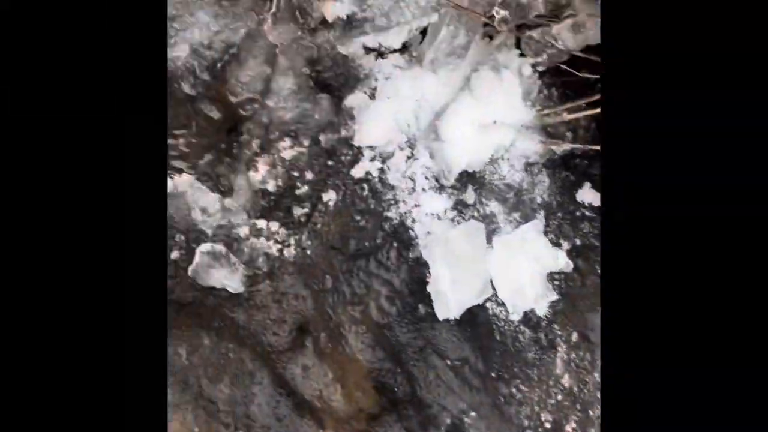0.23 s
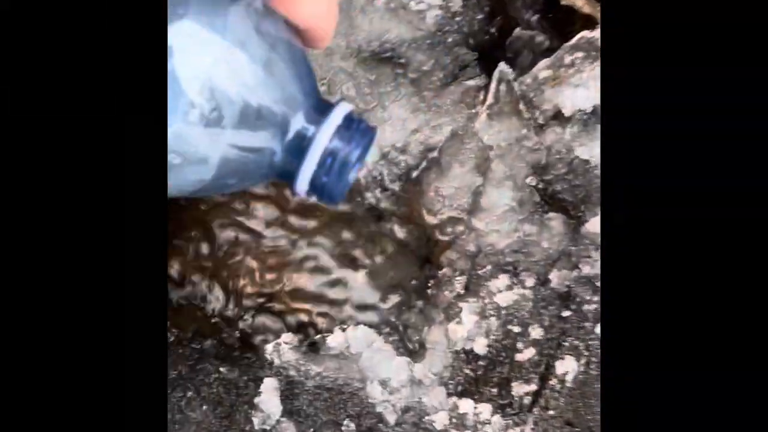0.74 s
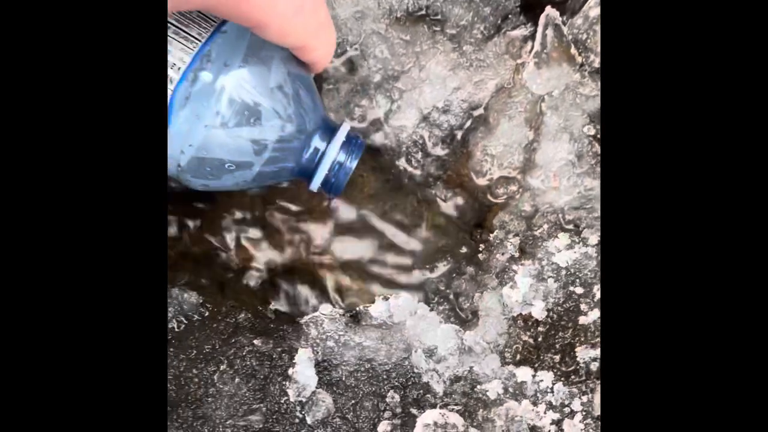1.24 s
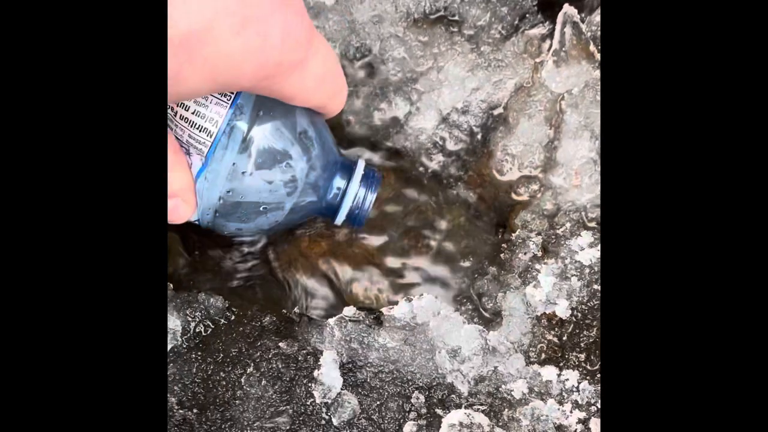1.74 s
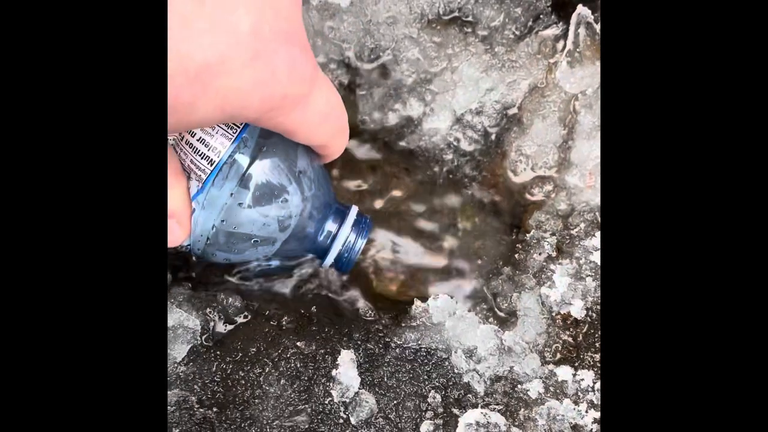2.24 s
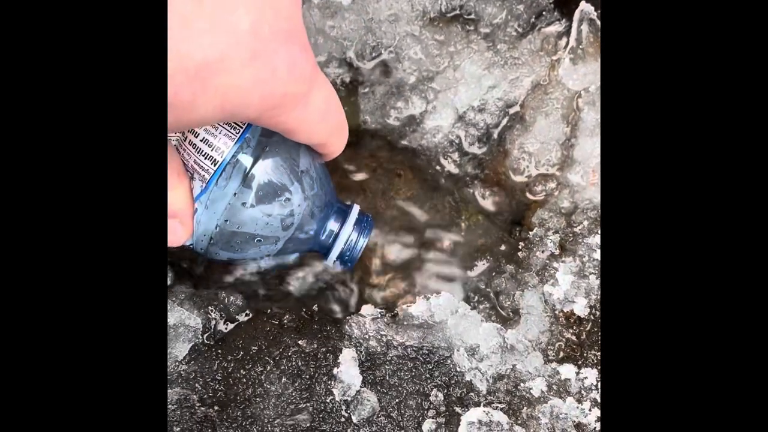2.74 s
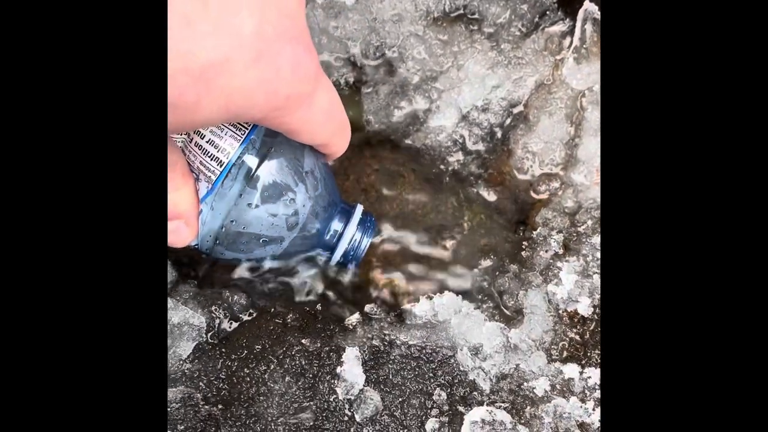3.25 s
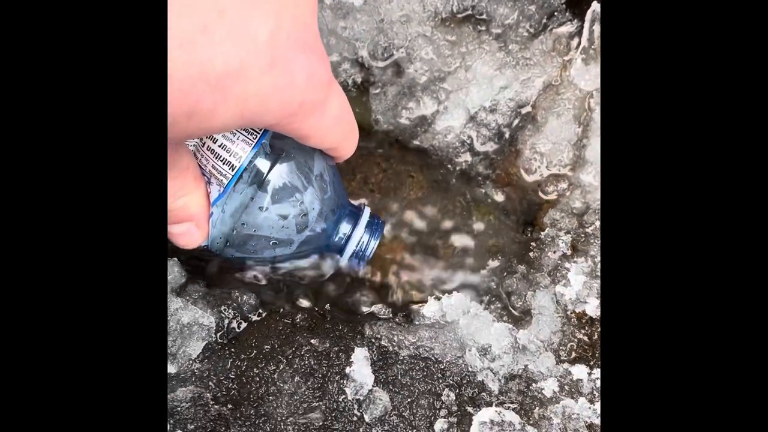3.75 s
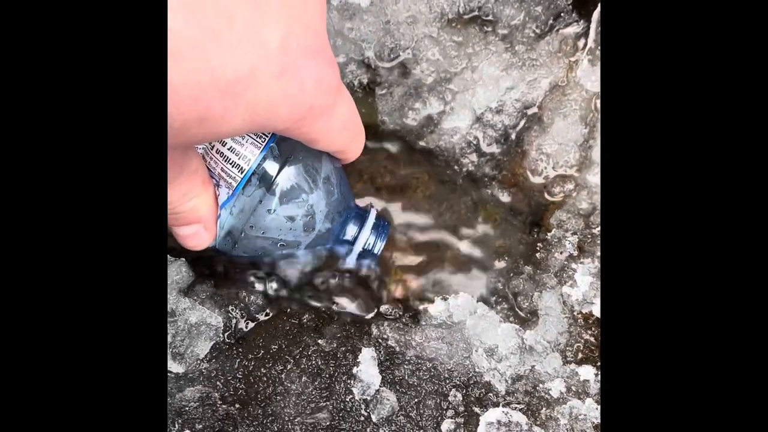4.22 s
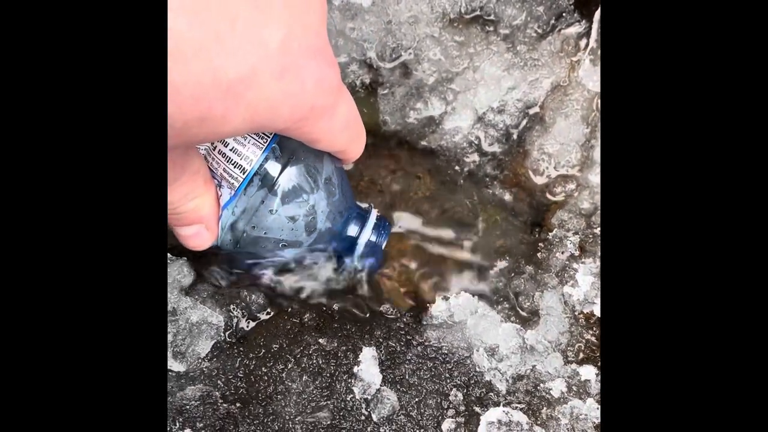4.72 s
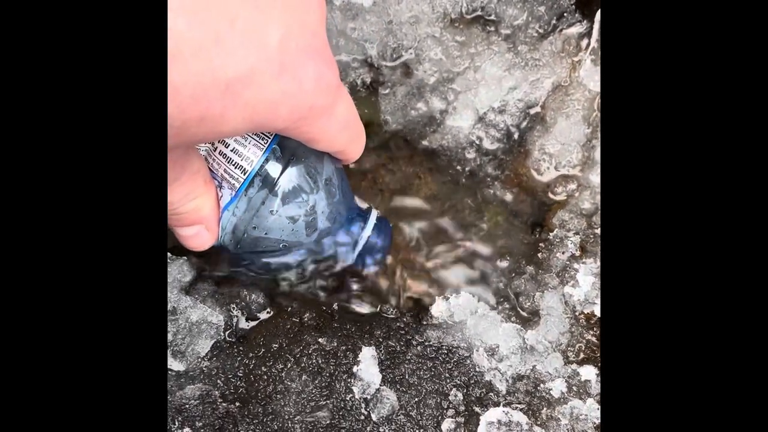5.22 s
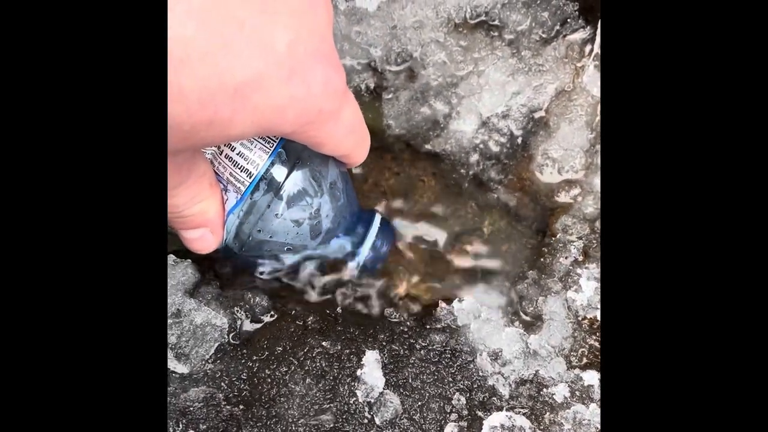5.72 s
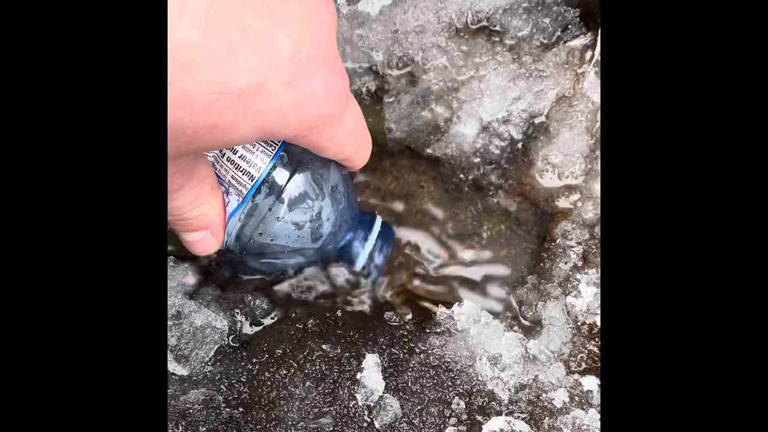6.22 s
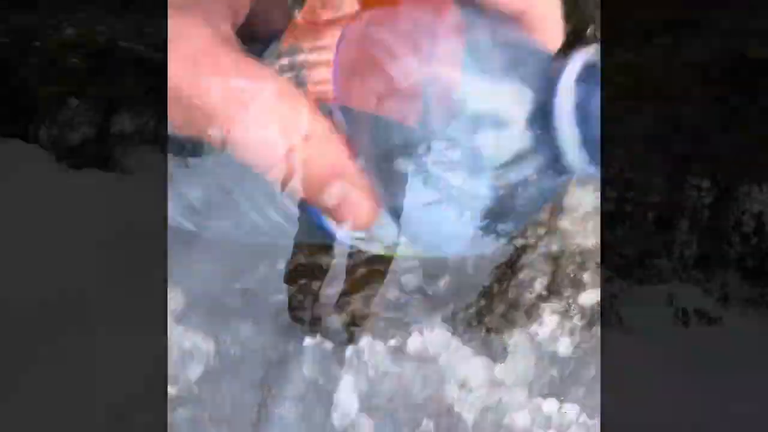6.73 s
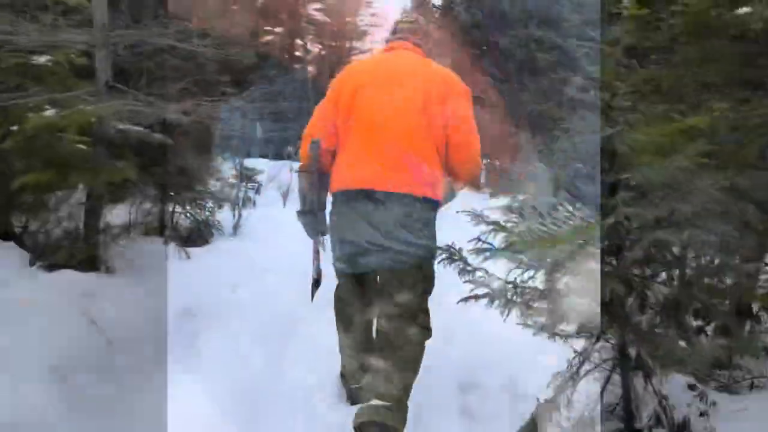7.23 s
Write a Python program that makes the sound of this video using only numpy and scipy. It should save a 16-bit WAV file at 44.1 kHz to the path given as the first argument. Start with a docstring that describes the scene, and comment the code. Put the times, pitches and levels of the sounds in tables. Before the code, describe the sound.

Close up outdoors, a shallow icy brook murmurs and hisses softly. A sleeve brushes, then a thin plastic bottle crackles with sharp, uneven snaps as it is pushed down, ending in two dull knocks on stone. Water then gurgles into the neck with irregular small glugs, plips and ticks. Lifting it brings another burst of loud plastic pops, and soft snow crunches under boots. A phone listens nearby in stereo.

```python
"""A thin plastic bottle crackles and knocks on stones as a hand pushes it into a shallow icy brook; air glugs
out of the neck while it fills, it crackles again when lifted, and boots crunch through snow at the end.
Snaps are noise bursts through ringing modes, knocks are decaying sines, bubbles are gliding sines and drops are
pitched puffs; friction, water, snow and rumble are filtered noise with moving levels. A phone with two microphone
ports listens from close by: below about 5 kHz near sounds are more alike in both than wide ones."""
import sys
import numpy as np
from scipy import signal
from scipy.fft import rfft, irfft, next_fast_len
from scipy.io import wavfile
from scipy.ndimage import uniform_filter1d

SR = 44100
rng = np.random.default_rng(int(sys.argv[2]) if len(sys.argv) > 2 else 0)


def dump_mix(stems):
    """Bounce the given channels to the path in sys.argv[1] as a 16-bit WAV at rate SR."""
    frames = np.atleast_2d(stems).T  # one column per channel
    limited = np.clip(frames, -1, 1)  # hard clip at full scale
    pcm = np.round(limited * 32767).astype(np.int16)
    wavfile.write(sys.argv[1], SR, pcm)


N = 329351

# ringing modes of the air and wall of the hollow bottle: f/Hz, relative level/dB, time to fall by 60 dB/s
HOLLOW_MODES = [(219.7, 3, 0.12), (265, -2, 0.059), (343, 6.5, 0.017), (376, -2.5, 0.032),
                (498.6, 5.5, 0.041), (720, -19.5, 0.016)]
# how lively the water trickles round the neck: t/s, level of the small bubbles/dB
TRICKLE_LEVEL = [(.3, -74), (1.8, -78), (2.15, -62.5), (3.2, -64.5), (4.4, -59), (5.4, -66), (6, -60.5),
                 (6.9, -55.5)]


def gain_of(db):
    """Decibels to amplitude."""
    return 10 ** (np.asarray(db) / 20)


def evened(x):
    """Scales to rms 1."""
    return x / np.sqrt(np.mean(x ** 2) + 1e-20)


def read(points, hz):
    """Reads a table over log frequency."""
    f, value = np.transpose(points)
    return np.interp(np.log(hz + 1), np.log(f + 1), value)


def add(mix, s, sound):
    """Mixes a sound in at s seconds."""
    part = mix[round(s * SR):][:len(sound)]
    part += sound[:len(part)]


def colour(x, points):
    """Causal minimum-phase filter with the given dB shape; white noise keeps its power."""
    shape_db = np.maximum(read(points, abs(np.fft.fftfreq(4096, 1 / SR))), -70)
    log_gain = np.log(gain_of(shape_db))
    taps = np.fft.ifft(np.exp(np.conj(signal.hilbert(log_gain)))).real[:2048]
    return signal.oaconvolve(x, taps / np.linalg.norm(taps))[:len(x)]


def ring(x, modes):
    """Passes x through decaying modes (f/Hz, width/Hz, level/dB); white noise keeps its power."""
    t = np.arange(4000) / SR
    taps = np.zeros(len(t))
    for hz, width, db in modes:
        decay = np.exp(-np.pi * width * t)
        taps += gain_of(db) * np.sqrt(width) * decay * np.sin(2 * np.pi * hz * t)
    return signal.oaconvolve(x, taps / np.linalg.norm(taps))[:len(x)]


def follow(rows, column=1):
    """One column of a curve at every sample, in dB; -120 dB outside its span."""
    rows = np.array(rows)
    return np.interp(np.arange(N) / SR, rows[:, 0], rows[:, column], -120, -120)


def grit(per_s, spread_db, share):
    """Noise with a share of separate clicks of uneven size."""
    size = gain_of(spread_db * np.minimum(rng.exponential(1, N), 3))
    clicks = size * (rng.random(N) < per_s / SR)
    puffs = signal.lfilter([1], [1, -.97], clicks) * rng.standard_normal(N)
    return evened((1 - share) * rng.standard_normal(N) + share * evened(puffs))


def patchy(x, spread_db):
    """Lets the level drift in patches of time and pitch."""
    z = signal.stft(x, nperseg=256)[2]
    field = uniform_filter1d(rng.standard_normal(z.shape), 4, axis=0)
    field = uniform_filter1d(field, 8, axis=1)
    return evened(signal.istft(z * gain_of(spread_db * evened(field)), nperseg=256)[1][:N])


def strokes(rows):
    """Gain of rubbing strokes: each swells, holds and dies away."""
    low = -24  # dB against the held level, at both ends of a stroke
    total = np.zeros(N)
    for s, db, rise, hold, fall in rows:
        total += gain_of(db + follow([(s - rise, low), (s, 0), (s + hold, 0), (s + hold + fall, low)]))
    return total


def snaps():
    """Each flipping dent, and late each crack of snow crust, is a noise burst through patch, wall and hollow modes."""
    # snaps of the bottle wall, and from 6.93 s the cracks of snow crust under boots: t/s, relative level/dB,
    # hollow body against it/dB, treble against it/dB, length/ms, pitch of the patch f/Hz
    cracks = [(0.8442, -22, 4.5, -8.5, 5.9, 473), (0.8466, -39, 10.5, -11, 16.5, 940),
              (0.863, -28, -12, -7, 5.6, 2800), (0.877, -33, -2.5, -13, 2.4, 2860),
              (0.9706, -31, 4, -10.5, 11.5, 1680), (0.9818, -23.5, -4, -21, 2.1, 1610),
              (0.986, -22, -11, -6.5, 2.5, 1510), (0.995, -22.5, -2.5, -12, 4.1, 1560),
              (1.0902, -35.5, -17.5, 2.5, 1.8, 5260), (1.1103, -39.5, -0.5, -8, 16, 930),
              (1.1294, -25, -1.5, -12, 20, 1000), (1.141, -32, -5, -14, 12.5, 1680),
              (1.1482, -14, 4.5, -10, 2.96, 2740), (1.1557, -16.5, 0.5, -13, 6, 1700),
              (1.182, -27, -21, -6, 3.3, 1720), (1.2182, -31, -12, -11, 1.7, 1000),
              (1.257, -30.5, 1, -12, 10.1, 1590), (1.2626, -27.5, 2, -5, 5.9, 1720),
              (1.2725, -31.5, -4, -7, 2.8, 1180), (1.2806, -34, -8, -15, 5.1, 695),
              (1.31, -32.5, -14, 1.5, 2.8, 1740), (1.3355, -27, -9, 13.5, 4.5, 5750),
              (1.372, -19.5, -25.5, -21.5, 2.8, 825), (1.4045, -23, 1, -10, 5.2, 3270),
              (1.4305, -21, 1.0, -4, 5.4, 880), (1.46, -14, -13.5, 1.5, 4.8, 5160),
              (1.469, -15.5, -10, -9.5, 3.1, 3140), (1.4965, -30, -1.5, 13, 2, 5870),
              (1.5248, -22, -4.5, -17, 12, 1670), (1.5404, -16, -5.5, 0, 5.7, 1050),
              (1.5479, -17, -7.5, -3, 5.9, 3240), (1.5623, -18.5, -1.5, -17, 3.6, 707),
              (1.578, -27, 13.5, 3.5, 0.62, 894), (1.611, -25.5, 0.5, -15, 1.64, 1740),
              (1.6281, -12.5, -19, 0, 2.8, 5070), (1.6353, -16.5, -19.5, -2, 9.2, 1830),
              (1.649, -13.5, -17.0, -2, 4.4, 1930), (1.7438, -33, -2, 3, 4, 5660),
              (1.7608, -16, -6.5, -24, 1.94, 767), (1.777, -30.5, -8, -32, 11, 680),
              (1.7948, -14, -5, -3.5, 1.3, 3800), (1.8342, -14, -12, -1.5, 3.7, 3450),
              (1.844, -7.5, -8.5, -6.5, 0.85, 1830), (1.8682, -22, -21.5, -11, 3, 1970),
              (1.9353, -13, -6, -15, 4.7, 1460), (2.026, -40.5, 10.5, -6.5, 4.2, 756),
              (6.4424, -26, 0, -17, 5.4, 990), (6.4576, -9, -30, -13, 5.05, 1490),
              (6.465, -15, -16, -12.5, 4.8, 960), (6.4792, -31, 11.5, -15, 4.2, 930),
              (6.495, -33.5, 9.5, -5, 5.4, 790), (6.5132, -23.5, 0, -10, 7.3, 980),
              (6.536, -30.5, 4.5, -3, 2.3, 5050), (6.5517, -6.5, -18.5, -10.5, 3.8, 633),
              (6.5632, -21.5, 6, -3, 5, 665), (6.578, -27.5, -3, -4, 6.8, 810),
              (6.586, -32.5, -4, -9, 7.1, 2650), (6.5951, -24.5, -1.5, -4.5, 3.5, 715),
              (6.6051, -22, -15, -10, 2.4, 2680), (6.691, -38, -4, -9, 5.9, 1010),
              (6.757, -17, -8, -43, 2.04, 1420), (6.9293, -36.5, 7, -25, 2.2, 650),
              (7.0582, -24, -17, 3.5, 2.96, 4550), (7.1177, -25, -4, -27, 0.7, 1780),
              (7.334, -35, -7, -12, 1.2, 905)]
    # resonances of the whole wall: f/Hz, width/Hz, relative level/dB
    wall_modes = [(990, 700, -0.5), (1743, 270, -1), (2690, 670, -2), (3620, 1700, -0.5)]
    # spectrum of the bright crackle: f/Hz, relative level/dB
    treble_tone = [(3500, -7), (5000, 5.5), (6500, 4), (9000, -0.5), (11500, -1.5), (13500, -3.5),
                   (15000, -8), (16500, -15.5)]

    t = np.arange(2600) / SR
    force, patch = np.zeros((3, N)), np.zeros(N)  # force rows drive the wall, hollow and treble
    for (s, db, body_db, treble_db, ms, hz), noise in zip(cracks, rng.standard_normal((len(cracks), 2600))):
        length = max(ms, .5) / 1000
        rise = .0005 + 0.19 * length  # long crumples swell, short snaps jump
        attack = np.minimum(t / rise, 1)
        burst = np.sin(np.pi / 2 * attack) ** 2 * np.exp(-(t / (length + rise)) ** 1.64)
        rattle = attack * np.exp(-t / 0.013)  # keeps rattling, mostly in the hollow band
        band_levels = (db - 3.0, db + body_db - 7, db + treble_db)
        for band, band_db, share in zip(force, band_levels, (.08, .2, .04)):
            add(band, s - rise, gain_of(band_db) * (burst + share * rattle))

        p = t[:600]
        ping = (1 - np.exp(-p * hz * 1.2)) * np.exp(-p * (120 + 0.34 * hz))
        bent_time = p - 0.00024 * np.exp(-p / 0.0012)  # pitch falls: fast bending waves come first
        ping *= np.sin(2 * np.pi * hz * bent_time)
        patch_db = db + max(treble_db, 0) * (hz > 4000) - 3.5
        pitched = signal.fftconvolve(burst * noise, ping / np.linalg.norm(ping))
        add(patch, s - rise, gain_of(patch_db) * pitched)

    force *= rng.standard_normal((3, N))
    hollow_modes = [(hz, 2.0 / t60, db) for hz, db, t60 in HOLLOW_MODES]
    wall = colour(ring(force[0], wall_modes), [(600, -4.5), (900, -2), (4200, -2), (7000, -31.5)])
    hollow = ring(force[1], hollow_modes)
    return patch + .5 * wall + 2.09 * hollow + colour(force[2], treble_tone)


def knocks():
    """A dull blow on stone rings the lowest modes of the bottle as decaying sines."""
    # low knocks of the bottle on stone: t/s, level/dB
    blows = [(2.025, -28.5), (2.056, -23.5)]
    t, out = np.arange(4000) / SR, np.zeros(N)
    body = np.zeros(len(t))
    for hz, db, t60 in HOLLOW_MODES:
        # hz / 60: a dull blow drives the high modes less
        body += gain_of(db - 60 * t / t60 - hz / 60) * np.sin(2 * np.pi * hz * t)
    for s, db in blows:
        add(out, s, gain_of(db) * body / abs(body).max())
    return out


def rubbing():
    """Gritty friction: a sleeve brushing, and the wall creaking as it slips under the grip."""
    # strokes of the sleeve: peak t/s, level/dB, rise/s, hold/s, fall/s
    brush_strokes = [(0.712, -40.5, 0.12, 0.064, 0.047)]
    # strokes of the creaking wall: peak t/s, level/dB, rise/s, hold/s, fall/s
    creak_strokes = [(1.086, -48, 0.29, .53, 0.031), (1.84, -45, .07, .03, .04), (2.0, -55, .03, .07, .05),
                     (6.54, -36, 0.17, .02, 0.097)]
    # spectrum of the sleeve: f/Hz, relative level per Hz/dB
    brush_tone = [(120, -63), (200, -21), (509, -13.5), (968, -11.5), (2090, -10), (6050, -22),
                  (7410, -34.5), (10300, -23), (16000, -58)]
    # spectrum of the creaking wall: f/Hz, relative level per Hz/dB
    creak_tone = [(59, -38), (100, -6), (481, 1), (991, -4.5), (1230, -7), (1720, -3), (3780, -13),
                  (5420, -18.5), (7610, -23), (16000, -38)]
    brush = strokes(brush_strokes) * colour(grit(1500, 4.4, 0.17), brush_tone)
    slips = grit(500, 12, .55)
    return brush + strokes(creak_strokes) * colour(slips, creak_tone)


def bubble(db, first_hz, glide, ms):
    """A pulsing pocket of air; its pitch bends, mostly late, as it nears the surface."""
    swell = 0.14  # share of the length spent swelling
    halfway = .18  # share of the glide done at half length
    u = np.arange(0, 1.25, 1000 / (max(ms, 2) * SR))  # time in lengths, with a tail
    hz = first_hz * (1 + glide * np.minimum(u, 1.1) ** (-np.log2(halfway)))
    fade = 1.7 / (1 + 2.1 * max(glide, 0))  # a bubble that rises to the surface keeps its strength
    shape = np.where(u < swell, np.sin(np.pi / 2 * u / swell), np.exp(-fade * (u - swell) / (1 - swell)))
    ending = np.clip((1.25 - u) * 4, 0, 1)
    return gain_of(db) * shape * ending * np.sin(2 * np.pi * np.cumsum(hz) / SR)


def gurgle():
    """The large bubbles at the neck; the smaller and higher they are, the more the churning water shakes them."""
    # large bubbles: t/s, level before the churn/dB, first f/Hz, glide as a share of it, length/ms
    large_bubbles = [(1.91, -46, 1350, 0, 22), (1.993, -42, 1450, -.2, 35), (2.161, -41.5, 2590, -0.14, 11),
                     (2.243, -52, 3220, -.05, 13.4), (2.327, -47, 2340, -.1, 12),
                     (2.429, -40, 962, -0.5, 29), (2.453, -25.5, 923, 0.2, 22),
                     (2.45, -45.5, 2210, -0.049, 8.5), (2.501, -50, 1150, 0.38, 31),
                     (2.5, -35.5, 823, 0.0023, 16.5), (2.777, -44, 1760, -.03, 19),
                     (2.885, -46.5, 584, 0.63, 54), (2.698, -48, 2190, -0.26, 8.5),
                     (2.902, -43, 1770, 0, 4.3), (2.904, -37, 3000, -0.42, 4.8),
                     (2.906, -38.5, 778, 0.83, 36), (2.94, -45, 1720, 0.082, 8.2),
                     (3.02, -50, 700, 0.17, 30), (3.233, -43, 4240, -.03, 12),
                     (3.254, -37, 1780, 0.094, 4.5), (3.292, -51, 1020, 0.32, 46),
                     (3.366, -49, 1830, 0.083, 10), (3.504, -53.5, 1067, 0.3, 48),
                     (3.536, -29, 3080, -0.19, 4.3), (3.538, -31, 1590, 0.18, 11),
                     (3.544, -40.5, 2440, 0.1, 13), (3.556, -47, 1660, 0.4, 14), (3.59, -49, 640, .03, 21),
                     (3.625, -44.5, 581, 0.63, 37), (3.67, -41.5, 1120, 0.032, 22),
                     (3.67, -39.5, 1880, -0.024, 13), (3.741, -51.5, 2700, 0, 34),
                     (3.795, -46.5, 764, 0.34, 44), (3.81, -45.5, 500, 0.011, 50),
                     (3.898, -36, 1100, 0.11, 17), (3.919, -32.5, 3090, -0.11, 10.4),
                     (3.953, -44, 3740, 0, 12.3), (4.015, -37, 773, .12, 25), (4.108, -45, 624, -0.22, 13),
                     (4.117, -45.5, 2650, 0, 23), (4.155, -46, 770, .05, 13),
                     (4.202, -38.5, 1340, -0.085, 20), (4.203, -43, 1740, -0.11, 11),
                     (4.228, -44, 1055, 0.19, 29), (4.277, -27.5, 938, -0.048, 22),
                     (4.288, -56, 3080, 0.26, 13), (4.328, -42.5, 1010, 0.56, 32),
                     (4.329, -32, 2250, 0.049, 3.9), (4.376, -39, 1480, 0.27, 15),
                     (4.406, -41, 2300, 0.053, 10), (4.449, -48, 2450, .15, 20),
                     (4.45, -42, 1870, -0.1, 15), (4.45, -43, 3230, 0.19, 9.7), (4.498, -45, 1025, 0, 11),
                     (4.622, -43.5, 1120, .5, 24), (4.636, -43.5, 1030, 0.2, 14),
                     (4.697, -46, 1630, 0.56, 13.5), (4.755, -51.5, 1090, .05, 28),
                     (4.798, -55, 3170, 0, 9), (4.865, -46, 492, 0.14, 30), (4.944, -45, 1780, 0.054, 11),
                     (4.948, -44, 940, 0, 10), (5.045, -42, 1380, -0.00033, 25),
                     (5.061, -55.5, 478, -0.065, 60), (5.085, -57, 2010, 0.16, 16),
                     (5.105, -43, 1474, 0.027, 14.4), (5.146, -51, 483, -0.11, 53),
                     (5.21, -54, 480, -0.23, 73), (5.212, -49.5, 2270, -0.016, 8),
                     (5.407, -48.5, 1253, 0.1, 37), (5.433, -44, 1830, -.07, 21),
                     (5.462, -46.5, 960, -0.12, 44), (5.584, -51.5, 1615, 0.27, 18),
                     (5.604, -47.5, 2520, .06, 31), (5.617, -47.5, 920, 0.38, 13),
                     (5.752, -46, 2760, -0.061, 17), (5.772, -36, 876, -0.058, 32),
                     (5.777, -45.5, 1970, 0.11, 16), (5.86, -52, 970, 0.18, 26),
                     (5.915, -35.5, 985, 0.026, 9.6), (5.992, -40.5, 1010, -0.23, 9.5),
                     (6.06, -48.5, 748, 0.11, 24), (6.147, -39.5, 920, -0.12, 11),
                     (6.161, -46, 2730, -0.047, 25), (6.209, -51, 1020, -0.033, 45),
                     (6.287, -43.5, 2120, -0.12, 15), (6.294, -40, 1350, -0.13, 17),
                     (6.296, -48, 2900, 0.29, 10), (6.374, -47, 2570, -0.14, 18),
                     (6.385, -42.5, 834, -0.43, 25), (6.778, -34, 562, 0.069, 20),
                     (6.926, -30.5, 890, -0.35, 11), (7.04, -34, 940, .01, 15)]
    out = np.zeros(N)
    churn = evened(uniform_filter1d(uniform_filter1d(rng.standard_normal(N), 70), 70))
    for s, db, hz, glide, ms in large_bubbles:
        pop = bubble(db, hz, glide, ms)
        shake = min(hz / 5000, .8) * churn[round(s * SR):][:len(pop)]
        add(out, s, pop * (1 + shake))
    return out


def trickle():
    """Many small bubbles in clumps, a few of them larger; only the low ones glide far."""
    out = np.zeros(N)
    clumps = np.repeat(rng.random(280), 3)  # three bubbles to a clump
    for clump, (when, size, pitch, glide, cycles) in zip(clumps, rng.random((840, 5))):
        hz = 550 * 8.0 ** (pitch ** 1.3)
        db = -3.5 * np.log(size + .03) - np.log2(hz / 1000)
        bend = (.5 * glide ** 3 - .05) * 700 / hz
        ms = 1000 * (9 + 22 * cycles ** 2) / (hz + 600)
        add(out, clump * 7 + 0.044 * when, bubble(db, hz, bend, ms))
    return gain_of(follow(TRICKLE_LEVEL)) * evened(out)


def clear_ticks():
    """Rows of the clearest bursting films and drops, in the columns that ticks() plays."""
    # clearest ticks: t/s, relative level/dB, pitch f/Hz, spray against it/dB
    rows = [(0.4247, -39, 3400, -6), (0.5941, -43, 5730, -7), (2.1624, -56, 2410, -21),
            (2.257, -50, 2870, 2), (2.2744, -50, 3900, -5), (2.3685, -66.5, 3900, 15.5),
            (2.451, -54, 7040, 8), (2.6982, -45, 5400, -14), (2.7526, -49, 4080, -12),
            (2.8385, -48, 6100, -11), (2.904, -42, 7040, -14), (2.916, -50, 4500, 7), (2.981, -62, 4440, 2),
            (3.06, -68, 7040, 15), (3.147, -55, 6100, -6), (3.198, -56, 4840, -8),
            (3.234, -44.5, 4200, -13), (3.2512, -46.5, 2010, -30), (3.2673, -46.5, 5750, -7),
            (3.3214, -47, 4220, -13), (3.364, -54, 6650, -10), (3.391, -48.5, 5000, 3),
            (3.428, -57, 5330, -8), (3.5361, -38, 2030, -16), (3.5635, -49, 4170, -3),
            (3.578, -49.5, 7060, -7), (3.6716, -42.5, 2030, -25), (3.744, -48, 3000, -9),
            (3.8964, -50.5, 2030, -5), (3.919, -41, 3030, -17), (3.9517, -47.5, 4170, 3.5),
            (4.119, -50.5, 2750, -2.5), (4.205, -40, 2960, -11.5), (4.2842, -44, 2920, -7),
            (4.33, -39.5, 2340, -16), (4.452, -40.5, 3160, -27.5), (4.4673, -48, 3170, -9),
            (4.549, -57, 2450, -2), (4.6182, -46.5, 2000, -7), (4.6397, -50, 6400, -9),
            (4.752, -53.5, 6240, -22), (4.818, -50.5, 7000, -5), (4.8362, -58, 4100, -15),
            (4.944, -49, 5030, -11), (5.052, -57, 7100, -13), (5.0832, -57.5, 2100, 4.5),
            (5.366, -50.5, 6440, 1), (5.4364, -42, 2050, -17), (5.462, -50, 6370, -12),
            (5.6055, -43, 2550, -18), (5.621, -54, 6550, 3), (5.747, -49, 4000, -30.5),
            (5.7745, -51.5, 2040, -1), (5.986, -47.5, 6400, -30), (6.0475, -47, 6400, -6),
            (6.164, -47.5, 2840, -11), (6.297, -42.5, 2480, -7), (6.383, -55, 2300, -4),
            (6.797, -43, 3300, -25), (6.857, -41.5, 4600, -20)]
    return rows


def faint_ticks(count):
    """Rows of many small ticks at chance moments while the neck is under water."""
    # range of the faint ticks, one row: start t/s, end t/s, relative level/dB, spread/dB,
    # low f/Hz, high f/Hz, spray against level/dB, spread of it/dB
    faint_range = (2, 6.5, -60, 0.5, 2201, 6800, -12.5, 11.5)
    start, end, db, spread_db, low_hz, high_hz, spray_db, spray_spread_db = faint_range
    when, size, pitch, fine = rng.random((count, 4)).T
    s = start + (end - start) * when
    level_db = db + spread_db * (2 * size - 1)
    hz = low_hz * (high_hz / low_hz) ** pitch
    return list(zip(s, level_db, hz, spray_db + spray_spread_db * (2 * fine - 1)))


def ticks(rows):
    """Films burst and drops land: a short puff round one pitch, with a fine spray on top."""
    # spectrum of the fine edge of a tick: f/Hz, relative level/dB
    spray_tone = [(4500, -2.5), (7000, -5.5), (10000, 4.5), (13000, 0), (16000, -6.5)]
    t, out, spray = np.arange(500) / SR, np.zeros(N), np.zeros(N)
    puff = np.minimum(t / 0.00099, 1) * np.exp(-t / 0.0041)
    for (s, db, hz, spray_db), noise in zip(rows, rng.standard_normal((len(rows), 500))):
        ping = np.exp(-t[:150] * 0.46 * hz) * np.sin(2 * np.pi * hz * t[:150])
        pitched = np.convolve(puff * noise, ping / np.linalg.norm(ping))
        add(out, s, gain_of(db + 3.5) * pitched)
        add(spray, s, gain_of(db + spray_db + 3) * puff)
    return out + colour(spray * rng.standard_normal(N), spray_tone)


def crunch():
    """Boots in snow: gritty noise swells and dies with each stroke."""
    # strokes of the boots: peak t/s, level/dB, rise/s, hold/s, fall/s
    boot_strokes = [(6.93, -40, 0.029, 0.084, 0.17), (7.05, -47.5, 0.077, 0.015, 0.35),
                    (7.23, -40, 0.22, 0.01, 0.79)]
    # spectrum of the crushed snow: f/Hz, relative level per Hz/dB
    snow_tone = [(35, -21), (60, -0.5), (256, -13.5), (480, -8.5), (3340, -20), (7230, -31), (8320, -55.5),
                 (8920, -43), (11500, -36), (13600, -43), (16000, -87.5)]
    return strokes(boot_strokes) * colour(grit(330, 5.8, 0.29), snow_tone)


def brook():
    """Two versions of running water: patchy murmur and hiss, and a fizz of tiny drops that follows the trickle."""
    # heard level of the water, which dips briefly after loud snaps: t/s, murmur level/dB,
    # hiss against it before a trim/dB
    heard_level = [(0.0, -51, 4.5), (0.46, -55, 7), (0.71, -56, 2.5), (1.45, -51.5, -0.5),
                   (1.64, -58, -9.5), (1.68, -85, -11.5), (1.73, -71, -12), (1.77, -58, -4),
                   (2.12, -59, -4.5), (2.7, -56.5, -12), (4.37, -55.5, -11), (5.1, -60.5, -11),
                   (6.18, -57.5, -11), (6.45, -57, 4), (6.78, -49, 4), (6.99, -54.5, 4.5), (7.47, -49, 3.5)]
    # spectrum of the murmur: f/Hz, relative level per Hz/dB
    murmur_tone = [(59, -27), (100, -11.5), (223, 4), (389, -1.5), (466, 4), (549, -7.5), (615, -4),
                   (942, -9), (1060, -5.5), (1390, -4), (2100, -15.5), (2600, -13), (3270, -29),
                   (5000, -35.5), (6500, -56), (11000, -120)]
    # spectrum of the hiss and fizz: f/Hz, relative level per Hz/dB
    hiss_tone = [(1500, 1), (2500, 2.5), (4000, 1), (6000, 0.5), (9000, -4.5), (13000, -3), (16500, -15)]
    level_db, versions = follow(heard_level), []
    hiss_db = level_db + follow(heard_level, column=2) - 2.5
    babble_db = 0.5 * evened(uniform_filter1d(rng.standard_normal(N), 2500))
    droplets = uniform_filter1d(abs(grit(60, 4.3, 0.92)), 160)  # both versions share these moments
    for noise in rng.standard_normal((2, 3, N)):
        murmur = gain_of(level_db + babble_db) * colour(patchy(noise[0], 3.6), murmur_tone)
        hiss = gain_of(hiss_db) * colour(patchy(noise[1], 4.6), hiss_tone)
        fizz = gain_of(follow(TRICKLE_LEVEL) - 9.0) * colour(patchy(droplets * noise[2], 11.0), hiss_tone)
        versions.append(murmur + hiss + fizz)
    return versions


def rumble():
    """A low rumble of filtered noise whose level wanders."""
    # level of the rumble: t/s, level/dB
    rumble_level = [(0, -64), (.85, -56), (1.45, -50.5), (1.8, -65.5), (4.4, -62.5), (5.1, -74.5),
                    (5.9, -69), (6.06, -64.5), (6.3, -65), (7.0, -54.5), (7.47, -52.5)]
    # spectrum of the rumble: f/Hz, relative level per Hz/dB
    rumble_tone = [(12, -36.5), (20, -16.5), (49, -2), (103, 0.5), (124, -8.5), (160, 4), (210, -25.5),
                   (350, -120)]
    return gain_of(follow(rumble_level)) * colour(rng.standard_normal(N), rumble_tone)


def wide():
    """Brook, snow and rumble come from all around: two versions of largely separate noise."""
    return [water + rumble() + crunch() for water in brook()]


def ports(x, other, alike):
    """The two ports hear one sound with a shift in phase and level, plus a part that differs."""
    # phase between the ports: f/Hz, lead of the left/rad
    left_lead = [(0, 0), (1000, -.5), (1380, -.9), (1900, .2), (3100, -1), (5000, -.2), (6000, 1.5),
                 (7600, 3.1), (11000, 6.3), (14100, 9.4), (16500, 11.4)]
    # balance of the ports: f/Hz, left over right/dB
    left_over_right = [(60, -1.5), (110, 1), (200, 0), (380, 2.5), (700, 7), (1290, 5), (2380, -0.5),
                       (4400, -0.5), (8120, 0.0), (15000, 0)]
    size = next_fast_len(N + 4096)
    hz = np.fft.rfftfreq(size, 1 / SR)
    same = np.clip(read(alike, hz), 0, 1)
    left = rfft(x, size)
    shared = same * left * np.exp(-1j * read(left_lead, hz))
    right = shared + np.sqrt(1 - same ** 2) * rfft(other, size)
    tilt = gain_of(read(left_over_right, hz) / 2)
    return irfft(np.array([left * tilt, right / tilt]), size)[:, :N]


def scene():
    """Near sounds, thin in the deep bass, over the wide ones."""
    # near sounds at the two ports: f/Hz, likeness from 0 to 1
    near_likeness = [(200, 1), (1000, 0.91), (1900, 0.85), (2500, .8), (4500, 0.37), (6000, 0.98),
                     (7600, 0.97), (9000, 1), (11000, 1), (12500, 0.42), (14200, 0.52), (16000, .8)]
    # wide sounds at the two ports: f/Hz, likeness from 0 to 1
    wide_likeness = [(40, 1), (100, 1), (400, 0.67), (1500, 0.12), (4500, 0.035), (6000, 1), (7600, 1),
                     (9000, 1), (11000, 0.95), (12500, .7), (14200, 1), (16000, .7)]
    tones = knocks() + gurgle() + trickle()
    drops = clear_ticks() + faint_ticks(count=70)
    # the noisy sounds are drawn afresh for each version, the tones are shared
    near = [tones + snaps() + ticks(drops) + rubbing() for _ in range(2)]
    near = signal.sosfilt(signal.butter(3, 150, "high", fs=SR, output="sos"), near)
    return ports(*near, near_likeness) + ports(*wide(), wide_likeness)


def record(dry):
    """The loudest snaps are squeezed softly under full scale; then the band limit."""
    edge_hz = 16500
    held = .95 * np.tanh(dry / .95)
    low_pass = signal.firwin(511, edge_hz, window=("kaiser", 9), fs=SR)
    return signal.oaconvolve(held, low_pass[None], "same")


dry = scene()
out = record(dry)
dump_mix(out)
```